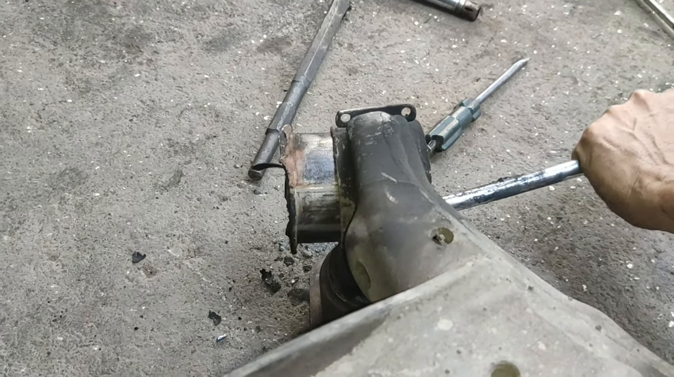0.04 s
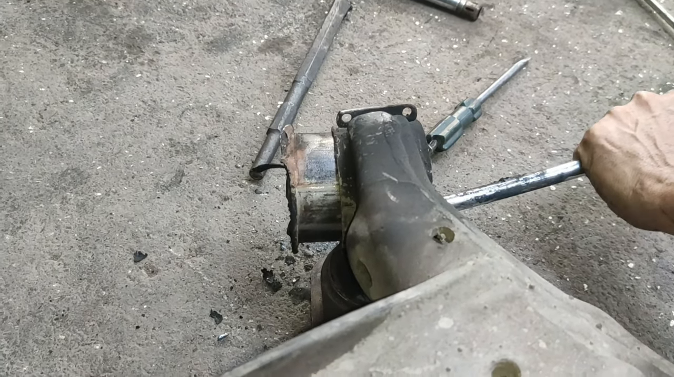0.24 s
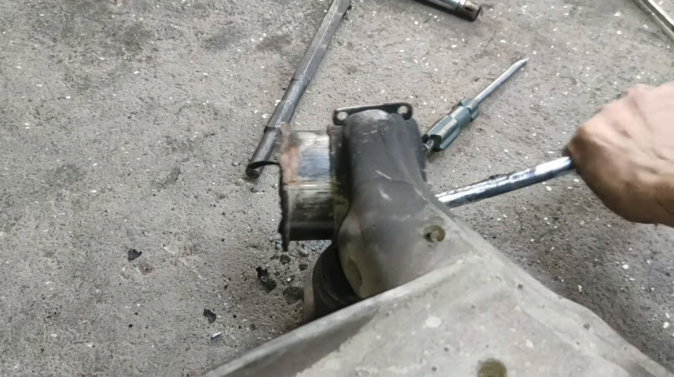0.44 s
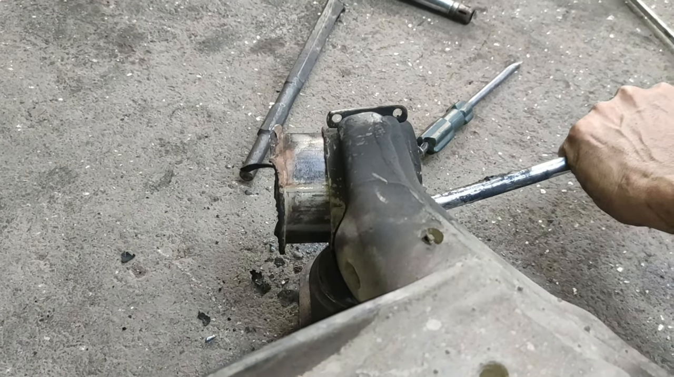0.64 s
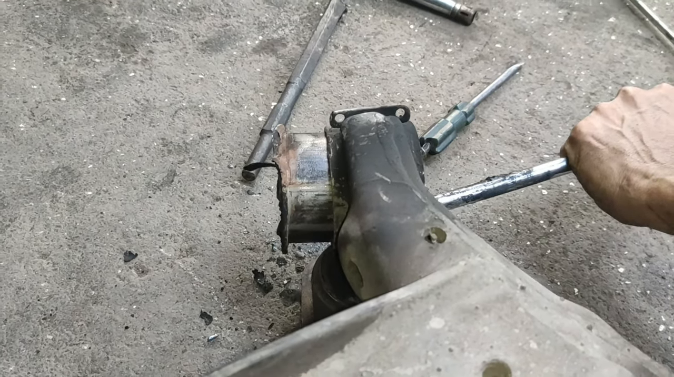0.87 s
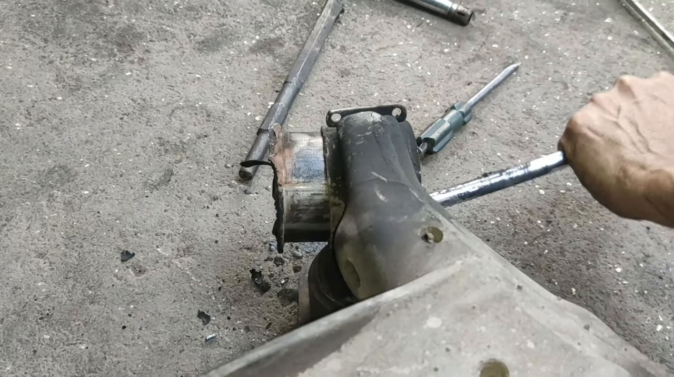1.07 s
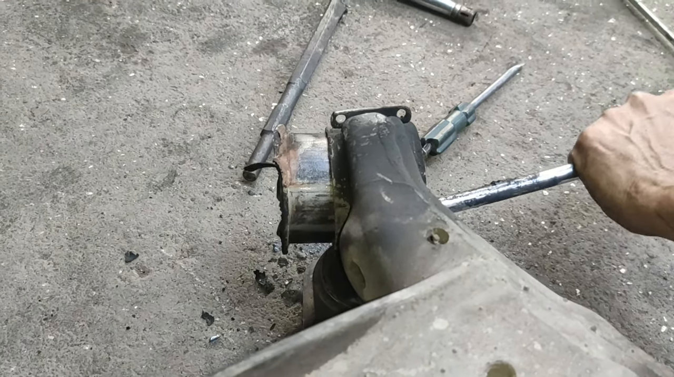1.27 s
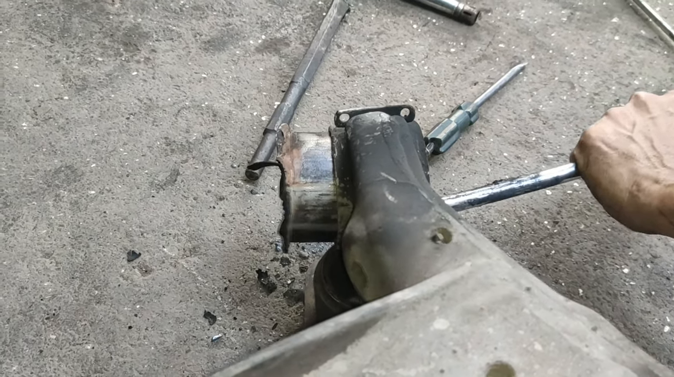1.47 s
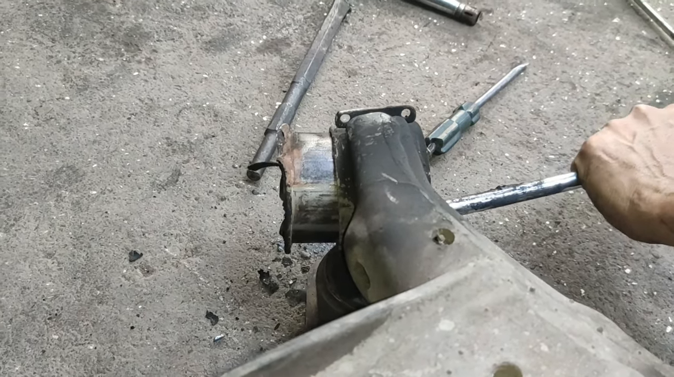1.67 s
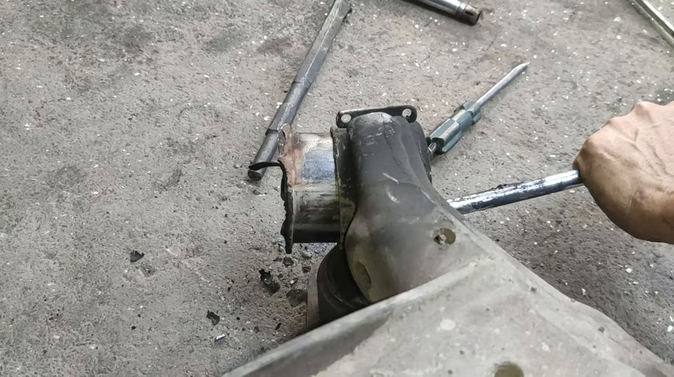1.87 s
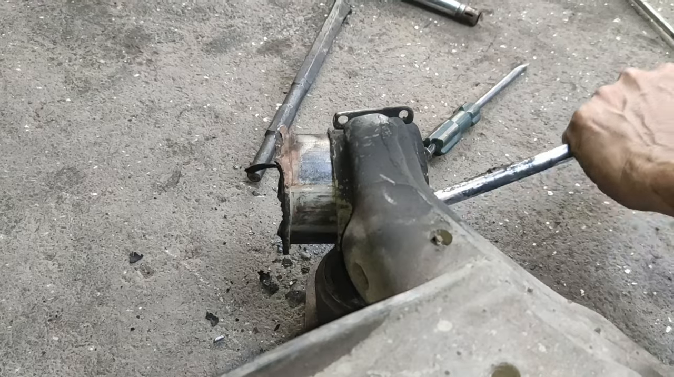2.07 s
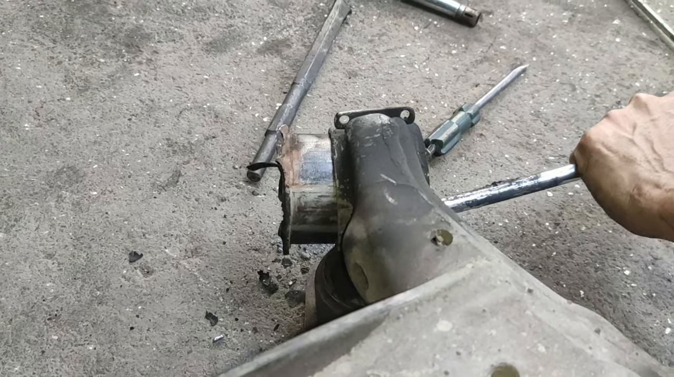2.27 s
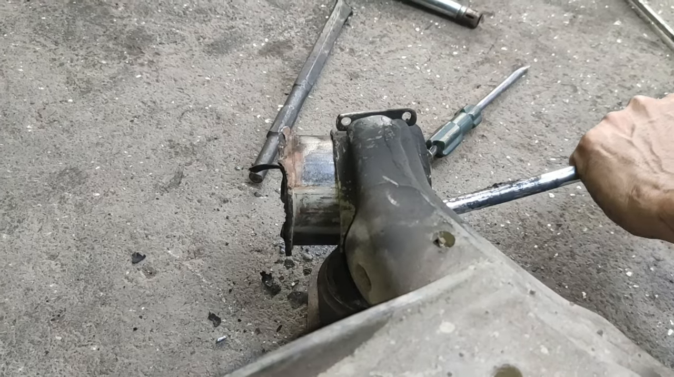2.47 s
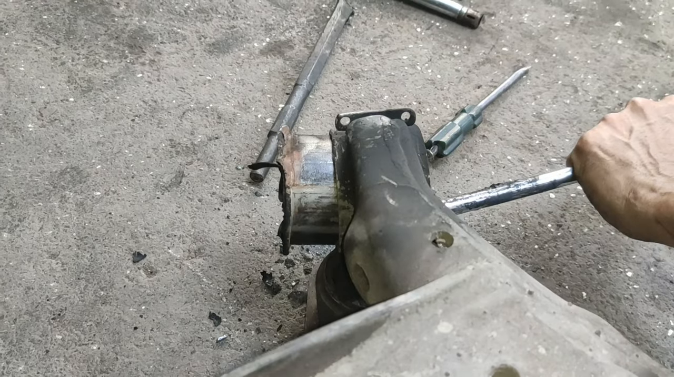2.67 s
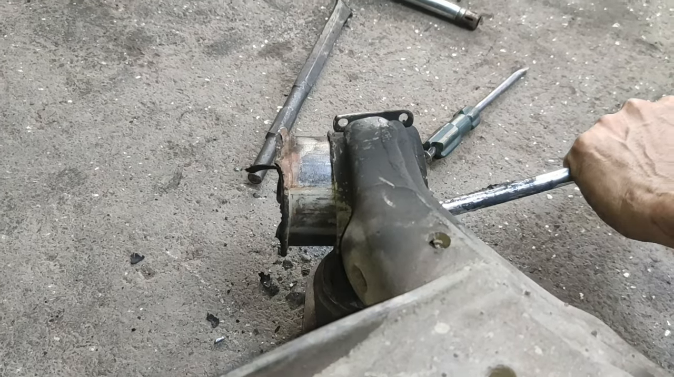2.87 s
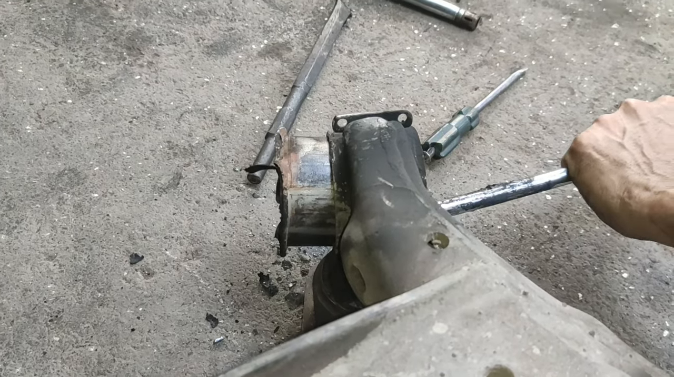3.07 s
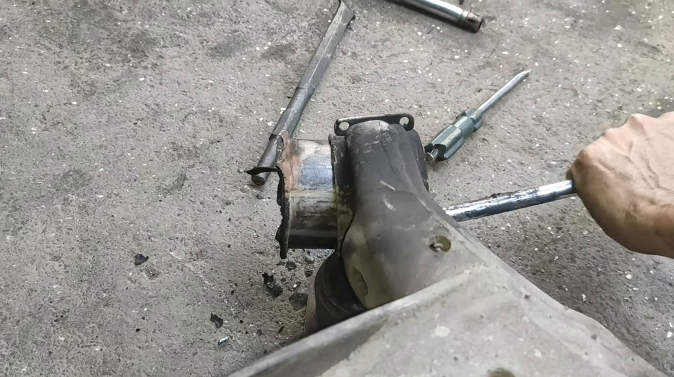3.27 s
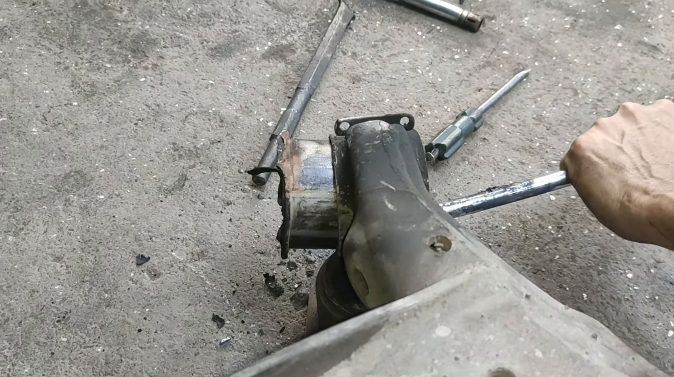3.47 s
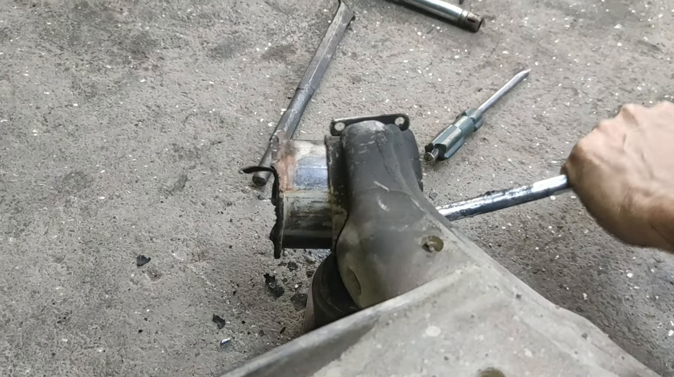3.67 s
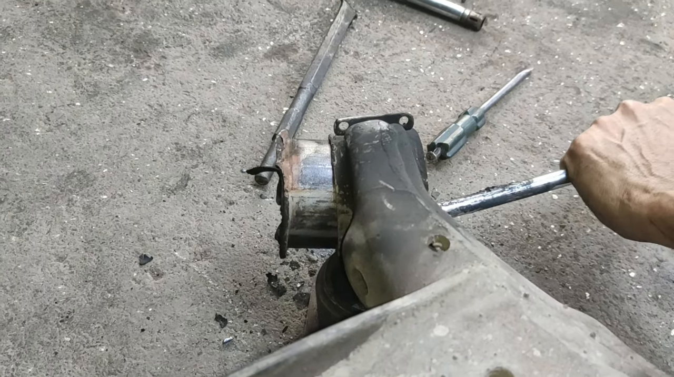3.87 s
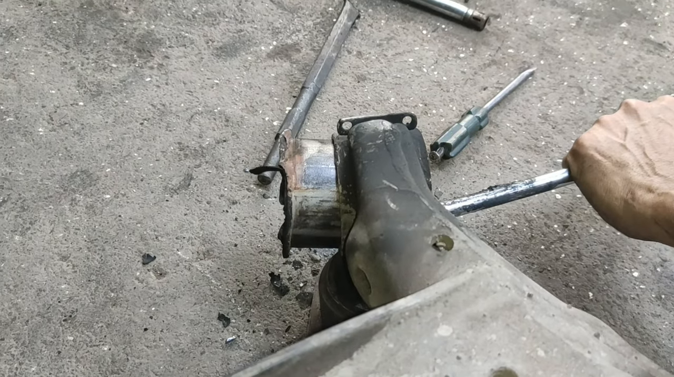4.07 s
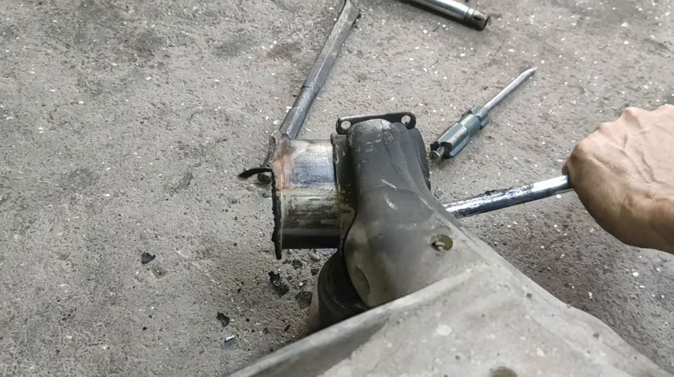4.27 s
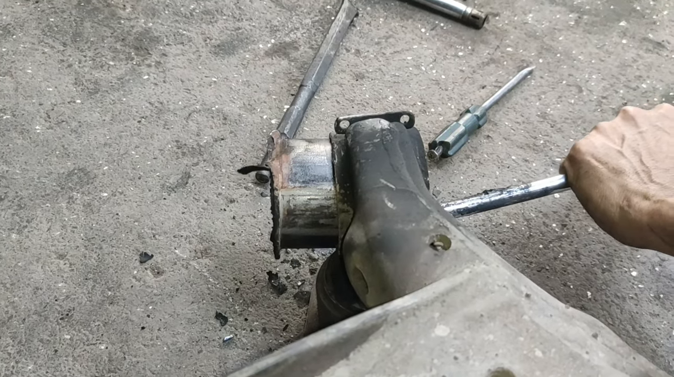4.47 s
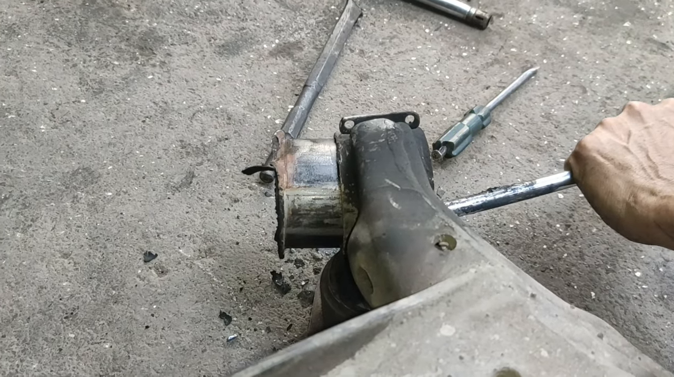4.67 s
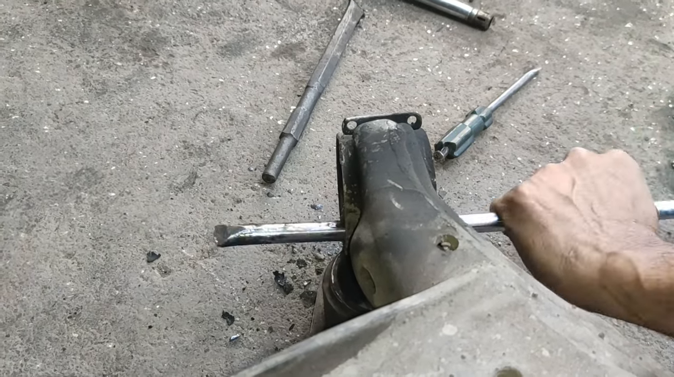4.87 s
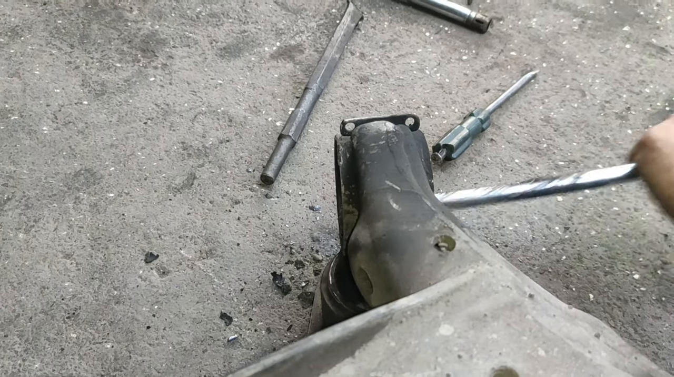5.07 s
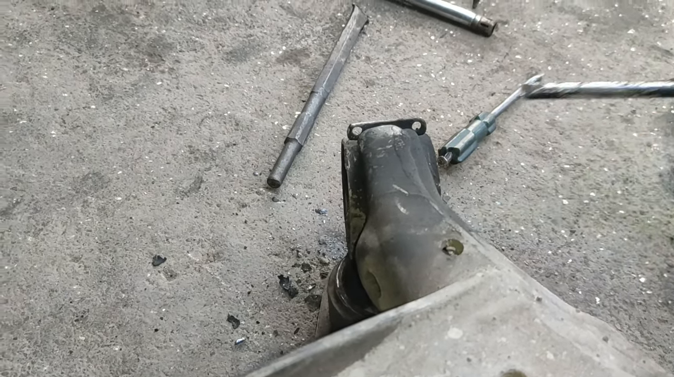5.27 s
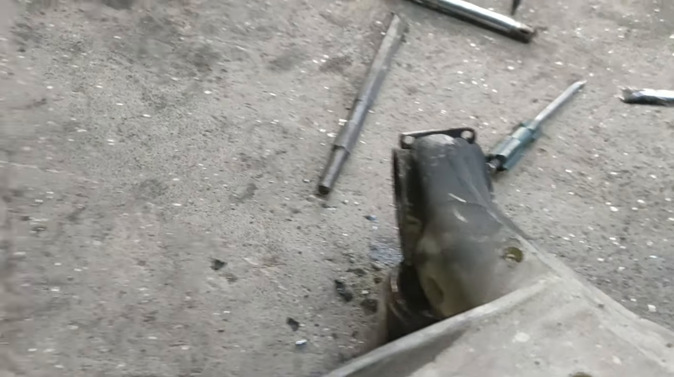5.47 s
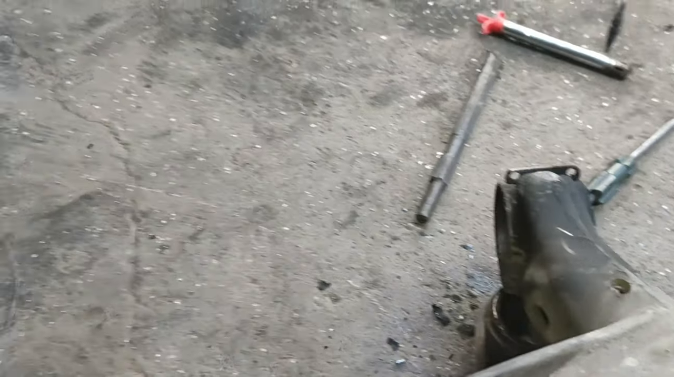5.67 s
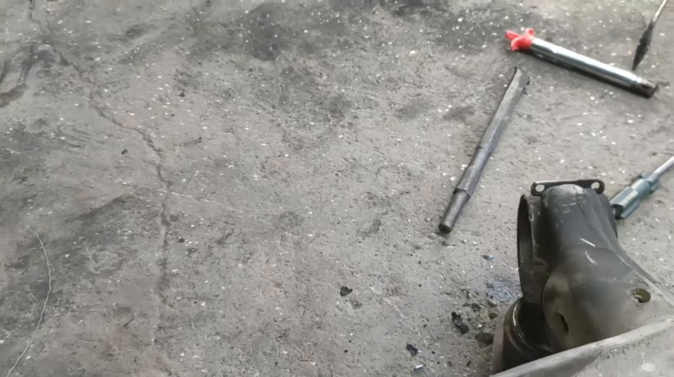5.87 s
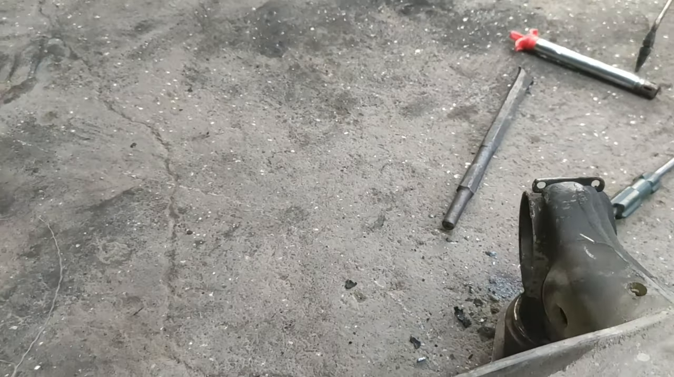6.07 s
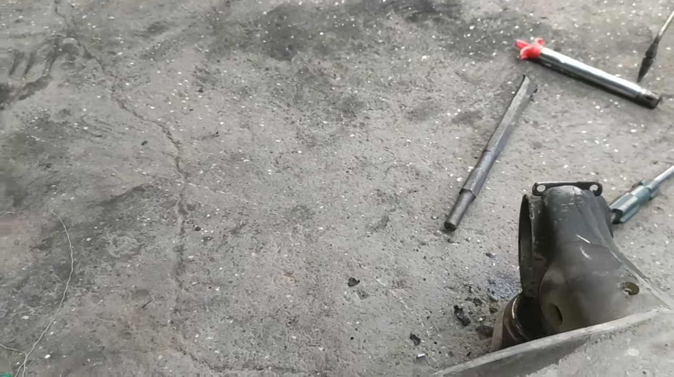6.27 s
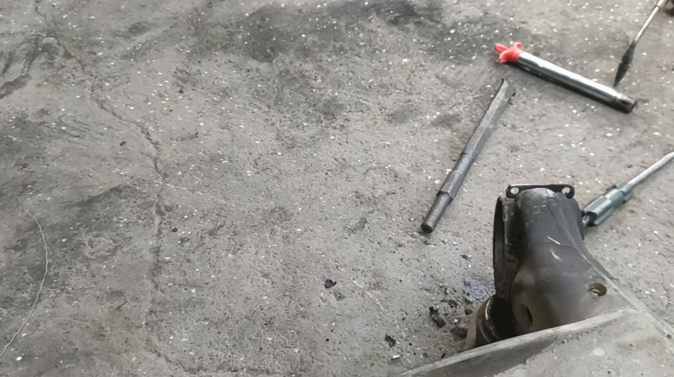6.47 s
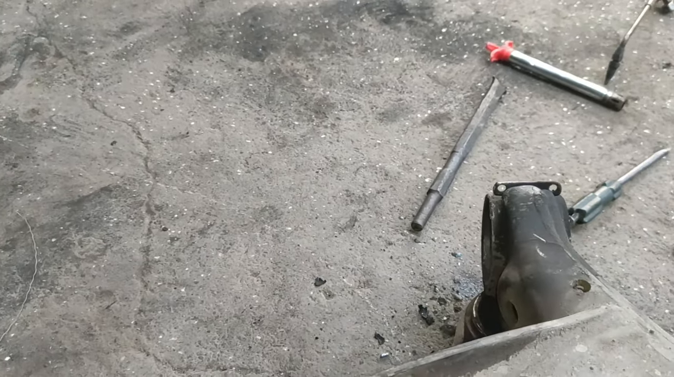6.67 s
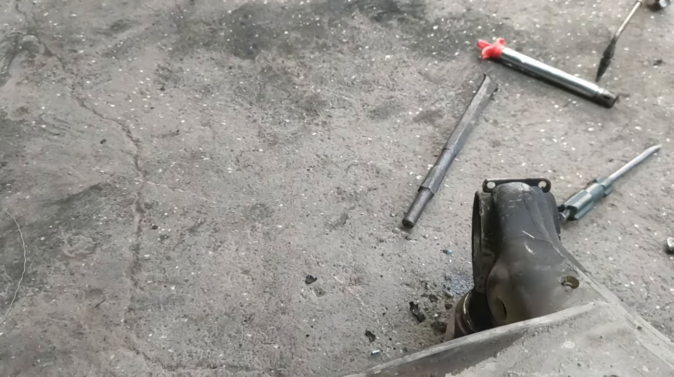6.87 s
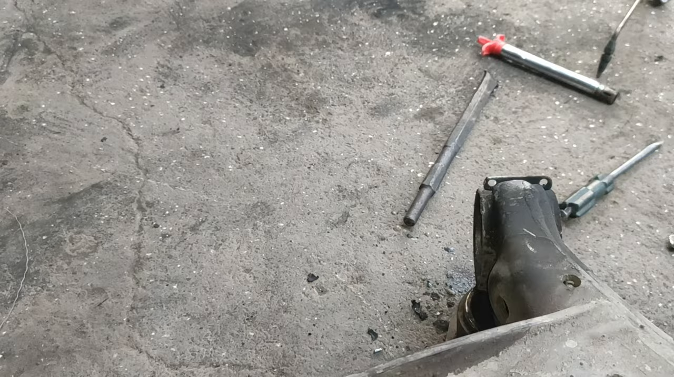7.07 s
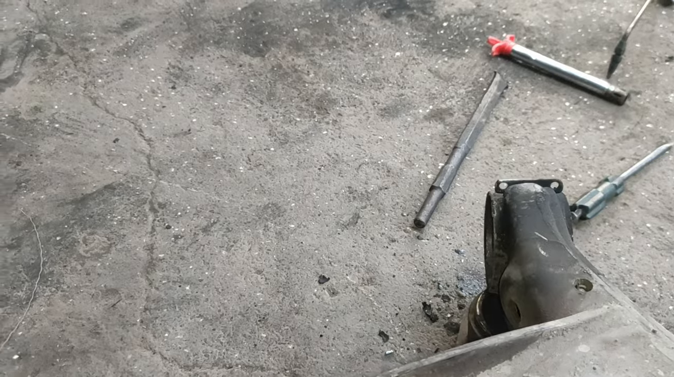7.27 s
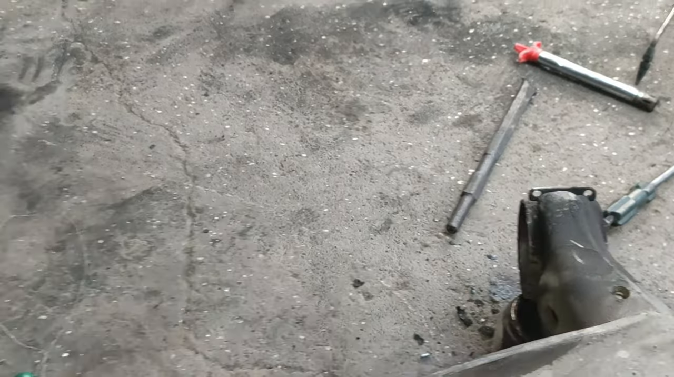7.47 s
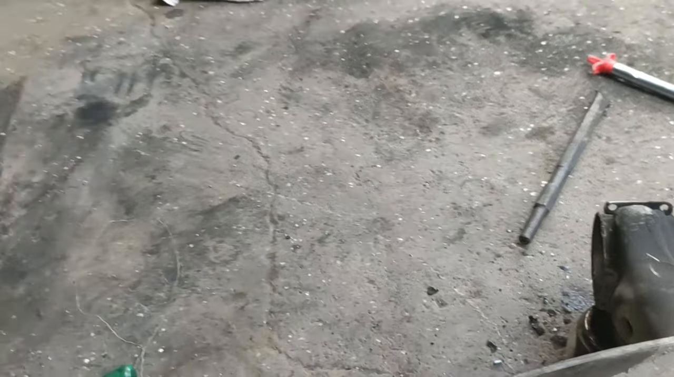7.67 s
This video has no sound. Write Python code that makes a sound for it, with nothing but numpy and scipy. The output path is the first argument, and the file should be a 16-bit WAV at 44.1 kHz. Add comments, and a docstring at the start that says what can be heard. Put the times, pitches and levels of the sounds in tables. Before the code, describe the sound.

In a reverberant workshop, a nearby phone catches steady, harsh steel-on-steel clangs with crunchy chatter and long metallic ringing. Small ticks come as the bar is reseated midway. Near five seconds the last blow grows brighter and thinner, a loose metal sleeve skips ringing across concrete, and heavy tools thud and clink down. Only fading ring, low distant rumble and thin hiss remain.

```python
"""Hard, clanging hammer blows fill a hard-walled workshop, heard close up by a phone that overloads.
The hammer drives a steel bar against an old bush in a suspension arm: noise and decaying sines make each clang.
The last blow frees the bush, whose steel sleeve bounces ringing over the concrete on decaying sines;
then hammer and bar are put down with noise thuds and ringing clinks. Filtered noise gives the hall and rumble."""
import sys
import numpy as np
from scipy import signal
from scipy.fft import rfft, irfft
from scipy.io import wavfile

SR = 44100
rng = np.random.default_rng(int(sys.argv[2]) if len(sys.argv) > 2 else 0)


def int16_out(signal):
    """Quantize to a 16-bit WAV file."""
    q = np.round(np.clip(np.atleast_2d(signal).T, -1, 1) * 32767)
    wavfile.write(sys.argv[1], SR, q.astype(np.int16))


N = 340872  # length of the scene in samples
LENGTH = 55296  # longest single sound in samples
AGE = np.arange(LENGTH) / SR  # seconds since a sound began
FREQ = np.fft.rfftfreq(LENGTH, 1 / SR)  # Hz


def undb(db):
    """Decibels to gain."""
    return 10 ** (np.asarray(db) / 20)


def read(points, hz):
    """Interpolate a table of (Hz, value) on a log-frequency axis."""
    f, value = np.transpose(points)
    return np.interp(np.log(hz + 1), np.log(f), value)


def fade(t60):
    """Exponential decay, 60 dB down after t60 seconds."""
    return np.exp(-np.log(1000) * AGE / t60)


def bump(x, centre, octaves):
    """A bell of height 1 on a logarithmic axis."""
    return np.exp(-.5 * (np.log2((x + 1) / centre) / octaves) ** 2)


def add(out, s, sound):
    """Mix a stereo sound in at time s, cut at both ends of the scene."""
    start = int(s * SR)
    a, b = max(start, 0), min(start + sound.shape[1], N)
    out[:, a:b] += sound[:, a - start:b - start]


def noise(db, alike_hz, likeness=1.0, size=LENGTH):
    """Stereo noise of rms 1 with a dB spectrum; the two microphone ports hear most alike below alike_hz."""
    hz = np.fft.rfftfreq(size, 1 / SR)
    alike = min(likeness, 1) / (1 + (hz / alike_hz) ** 2)
    spectra = rfft(rng.standard_normal((2, size))) * undb(db)
    mid, side = spectra * np.sqrt([1 + alike, 1 - alike])
    x = irfft([mid + side, mid - side], size)
    return x / x.std()


def die_away(x, t60s):
    """Split x into overlapping bands and let each decay in its own time."""
    spectrum, out = rfft(x), 0
    centres = [hz for hz, _ in t60s]
    for (_, t60), share in zip(t60s, np.eye(len(t60s))):
        band = irfft(spectrum * read(list(zip(centres, share)), FREQ))
        out = out + band * fade(t60)
    return out


def patches(width_hz):
    """Random clusters and gaps in a dense set of modes; spread near 1."""
    knots = np.arange(0, SR / 2, width_hz)
    return np.interp(FREQ, knots, rng.standard_normal(len(knots)))


def waver(rate_hz, count):
    """Rows of random drift, with a new target rate_hz times a second; spread near 1."""
    knots = np.arange(0, AGE[-1] + 1, 1 / rate_hz)
    return np.array([np.interp(AGE, knots, row) for row in rng.standard_normal((count, len(knots)))])


def ringing(modes):
    """One decaying complex sine for each mode."""
    return np.array([undb(db) * fade(t60) * np.exp(2j * np.pi * hz * AGE) for hz, db, t60 in modes])


def strike(rings, hz, lift_db, scatter_db):
    """Modes excited by one contact; the higher ones reach the two ports with more unlike phase."""
    phase, apart, left, right = rng.standard_normal((4, len(hz)))
    spread = np.minimum(hz / 700, 2)  # radians between the ports, before scatter
    turn = 2 * np.pi * phase + np.outer([-.5, .5], spread * (1 + .5 * apart))
    gain = undb(lift_db + scatter_db * np.array([left, right]))
    return ((gain * np.exp(1j * turn)) @ rings).imag


# Background of the workshop at the microphone. Each row: frequency in Hz, relative level in dB per Hz.
AIR_SPECTRUM = [(12, -35), (20, 0), (107, -4), (137, -13.5), (221, -13), (247, -21), (276, -15), (309, -20),
                (420, -26), (639, -23.5), (1520, -31), (5200, -34), (9880, -38.5), (15900, -50.5)]


def workshop():
    """Distant rumble and a thin hiss: steady filtered noise whose level drifts slightly."""
    db = read(AIR_SPECTRUM, np.fft.rfftfreq(N, 1 / SR))
    swell = np.interp(np.arange(N) / SR, np.arange(40) / 5, rng.standard_normal(40))
    air = noise(db, alike_hz=900, likeness=.68, size=N)
    left_right_db = np.array([[-33.2], [-34.5]])
    return undb(left_right_db + .5 * swell) * air


# Echoes between the far walls. Each row: frequency in Hz, decay by 60 dB in seconds.
HALL_DECAY = [(100, 1.9), (300, 1.21), (900, 0.95), (2000, 1.044), (4500, 0.96), (8500, 0.7), (14000, 0.34)]


def hall(x, build_s):
    """Diffuse echoes build up between the far walls and die away, the high treble soonest."""
    colour_db = read([(100, -1.5), (400, 1.5), (1000, 3.0), (3000, -2), (8000, 0), (15000, 6)], FREQ)
    echoes = die_away(noise(colour_db, alike_hz=650), HALL_DECAY) * (1 - fade(build_s))
    boom_db = read([(80, -28), (135, -3), (170, -3.0), (205, -7.0), (260, -7.0), (450, -15), (2000, -98)], FREQ)
    boom = noise(boom_db, alike_hz=800)
    # the low boom arrives late, strongest after 85 ms
    echoes += undb(-19.0) * boom * bump(AGE * SR, .085 * SR, octaves=0.24)
    echoes /= np.sqrt(np.sum(echoes ** 2) / 2)  # unit energy
    return signal.fftconvolve(x, echoes, axes=1)[:, :N]


# Steel touching something hard, close by. Each row: frequency in Hz, relative level in dB.
CLICK_SPECTRUM = [(300, -3), (1500, -6.5), (4000, -0.5), (8000, 3.5), (15000, -10)]


def click(db, t60):
    """The short bright crack of steel touching something hard: decaying noise."""
    return undb(db) * noise(read(CLICK_SPECTRUM, FREQ), alike_hz=1500) * fade(t60)


# Bush, hammer and bar landing dully on the concrete. Each row: start in seconds, level in dB, pitch in Hz.
LANDINGS = [(4.961, -14.5, 278), (5.103, -16.5, 647), (5.336, -29, 721), (5.767, -16, 660),
            (5.8437, -13.5, 267), (5.974, -25, 227), (6.015, -16, 252), (6.174, -18, 1270)]
# The thud of concrete. Each row: frequency in Hz, relative level in dB.
THUD_SPECTRUM = [(60, -15), (220, 0), (600, 2), (1300, -5.5), (3000, -11.5), (7000, -26), (16000, -69)]
# Small metal ticks as the bar is seated again. Each row: start in seconds, level in dB.
SEATING_TICKS = [(2.9581, -15.5), (2.98, -20), (3.166, -25)]
REBOUND_S, REBOUND_SHRINK, REBOUND_DB = .024, .8, -12  # first hop in s, ratio of the next, dB per hop
LANDING_S = 0.0018  # each knock swells in softly over this many seconds


def knocks():
    """Heavy things landing on concrete thud, hop and rattle on the grit; the bar ticks in its seat."""
    out = np.zeros((2, N))
    for s, db, hz in LANDINGS:
        thud_db = read(THUD_SPECTRUM, FREQ) + 7.5 * bump(FREQ, hz, octaves=0.3)  # the pitch stands out
        for hop in range(3):  # each hop comes sooner and weaker
            thud = noise(thud_db, alike_hz=1390)
            rattle = undb(-13.5 + 3.8 * waver(rate_hz=147, count=1)) * fade(0.6) * thud
            knock = die_away(thud, [(250, 0.1), (900, 0.038), (4000, 0.018)]) + rattle
            add(out, s, undb(db + hop * REBOUND_DB) * knock * (1 - fade(LANDING_S)))
            s = s + REBOUND_S * REBOUND_SHRINK ** hop
    for s, db in SEATING_TICKS:
        add(out, s, click(db, t60=0.097))
    return out


def dropped(modes, contacts, lift_db, octaves, click_db, click_growth, click_t60,
            pan_db, tumble_hz, tumble_db):
    """A steel part meeting the floor: each contact favours a group of modes and clicks louder the harder it is."""
    out, rings, hz = np.zeros((2, N)), ringing(modes), np.array(modes)[:, 0]
    hardest_db = max(ring_db for _, ring_db, _ in contacts)
    for s, ring_db, best_hz in contacts:
        # as the part turns, the lobes of each mode sweep past the microphone
        turning = rings * undb(tumble_db * waver(tumble_hz, count=len(hz)))
        excited_db = ring_db + lift_db * bump(hz, best_hz, octaves)
        ring = strike(turning, hz, excited_db, scatter_db=5.5)
        crack = click(click_db + click_growth * (ring_db - hardest_db), click_t60)
        add(out, s, ring * undb([[pan_db / 2], [-pan_db / 2]]) + crack)
    return out


# Bending modes of the bar. Each row: frequency in Hz, relative level in dB, decay by 60 dB in seconds.
BAR_MODES = [(2789, -7, 0.33), (4590, -1.5, 0.25), (6784, 5, 0.34), (9200, 4, 0.2), (11940, -9.5, 0.26),
             (15210, -18, .24)]
# The bar meets the floor. Each row: start in seconds, ring level in dB, best excited frequency in Hz.
BAR_CLINKS = [(5.7517, -32.5, 4260), (5.885, -36, 12900), (5.901, -34.5, 10600), (6.175, -23, 4550),
              (6.2, -19, 3550), (6.311, -44.5, 5560)]


def bar_put_down():
    """The bar clinks on the floor and its bending modes ring briefly."""
    return dropped(BAR_MODES, BAR_CLINKS, lift_db=11.5, octaves=0.44, click_db=-19.5, click_growth=0.47,
                   click_t60=0.025, pan_db=0.5, tumble_hz=30.6, tumble_db=0.5)


# Ring modes of the bush's sleeve, some in close pairs.
# Each row: frequency in Hz, relative level in dB, decay by 60 dB in seconds while it is free.
SLEEVE_MODES = [(1254, -10, 1.2), (1322, -3, 1.3), (1863, -6, 1.5), (3305, -2, .7), (3596, -9, .6),
                (3768, -5, .42), (4138, -6, .55), (5001, -2, .52), (6250, -12, .3), (6432, 0, .33),
                (6681, 0, .42), (7257, -14, .25), (7754, -7, .22), (8140, -2, .2), (8366, -6, .22),
                (9162, -15, .25), (10350, -15, .3), (10815, -12, .25), (12400, -14, .22), (12785, -12, .25),
                (13464, -13, .3), (14660, -16, .25), (15400, -16, .2)]
# The sleeve is struck free, bounces and rocks.
# Each row: start in seconds, ring level in dB, best excited frequency in Hz.
SLEEVE_BOUNCES = [(4.772, -26.5, 6700), (4.9605, -26, 3940), (5.103, -31, 4670), (5.1955, -32.5, 5960),
                  (5.2615, -24, 5000), (5.265, -25, 7800), (5.335, -43, 1330), (5.42, -36.5, 1770)]
REST_S, REST_T60 = 5.47, 0.64  # in s: the sleeve comes to lie on its side, which adds this decay


def sleeve_bouncing():
    """The freed sleeve rings in its ring modes at each bounce, until lying on its side damps it."""
    sleeve = dropped(SLEEVE_MODES, SLEEVE_BOUNCES, lift_db=10.5, octaves=0.15, click_db=-9, click_growth=1.9,
                     click_t60=0.062, pan_db=4.5, tumble_hz=27.2, tumble_db=8.0)
    lying_s = np.maximum(np.arange(N) / SR - REST_S, 0)
    return sleeve * np.exp(-np.log(1000) * lying_s / REST_T60)


# Hammer blows close to the microphone; the first is already under way. Each row: start in seconds,
# force in dB, resonance in Hz that this seating of the bar favours, its lift in dB.
HAMMER_BLOWS = [(-.035, 4, 5070, -0.5), (0.484, 2, 3360, 2.5), (0.9951, 2.5, 6370, 4.5),
                (1.529, 2.5, 4500, 5), (2.0572, 0.5, 3280, 2), (2.6, 2, 4600, 3), (3.1745, 2, 5240, 2),
                (3.7076, 2, 6430, 6), (4.2495, 3, 6450, 5), (4.7723, 0.5, 7050, 1)]
FREE_S = HAMMER_BLOWS[-1][0]  # the last blow frees the bush


def slipping(s, tight_db, change_db, onset_s):
    """Level of one part of a blow at time s: the bush loses its grip ever faster until it comes free."""
    return tight_db + change_db * np.exp((s - FREE_S) / onset_s)


# The clang's dense modes. Each row: frequency in Hz, relative level in dB.
CLANG_SPECTRUM = [(40, -0.5), (110, -4), (190, -2), (310, -7.5), (550, 1.5), (1150, -1.5), (1520, -5),
                  (2200, 0), (2800, -1.5), (4000, 0.5), (6400, -1.5), (7300, -3), (10000, -5.5),
                  (15500, -13.5)]
# How the clang dies away. Each row: frequency in Hz, decay by 60 dB in seconds.
CLANG_DECAY = [(100, 0.73), (700, 0.84), (2500, 0.81), (7000, 0.72), (15000, 0.42)]
# Strong modes of the arm. Each row: frequency in Hz, relative level in dB, decay by 60 dB in seconds.
ARM_MODES = [(175.4, -6.5, 0.54), (198, -26.5, 1.6), (400, -16, 1.3), (545, -17.5, 1.5), (623, -7, 0.94),
             (730, -31, 0.66), (913.4, -5, 1.42), (1023, 1, 0.89), (1107, -2.5, 1.06), (1169, 7.5, 0.61),
             (1250, 6.5, 0.2), (1320, 4, 0.33), (1660, -8, 0.52), (2224, 6, 0.31), (2260, 8, 0.32),
             (2766, -3.5, 0.31), (3260, 7.5, 0.42), (6030, -21, 0.32), (6930, -3.5, 1.06)]
PORT_LAG = 15  # samples by which the left port hears the clang later; the right port is nearer


def hammering():
    """Each blow: a light first touch, a crack, the arm's dense clang and its few long modes."""
    clangs, tones = np.zeros((2, 2, N))
    rings, arm_hz = ringing(ARM_MODES), np.array(ARM_MODES)[:, 0]
    body_db = read(CLANG_SPECTRUM, FREQ) + 1.6 * patches(width_hz=42)
    for s, force_db, seat_hz, seat_db in HAMMER_BLOWS:
        bass_db = slipping(s, tight_db=1.6, change_db=-5.5, onset_s=0.8)
        treble_db = slipping(s, tight_db=0.84, change_db=6, onset_s=0.3)
        tilt = [(600, bass_db), (2500, 0), (9000, treble_db)]
        # every seating of the bar wakes other clusters of modes, with wider ones added in the treble
        wide_db = read([(1500, 0), (3000, 1.6)], FREQ) * patches(width_hz=170)
        clusters_db = 2 * patches(width_hz=60) + wide_db
        seating_db = seat_db * bump(FREQ, seat_hz, octaves=0.062)
        colour_db = body_db + read(tilt, FREQ) + seating_db + clusters_db
        clang = undb(-5.0) * die_away(noise(colour_db, alike_hz=2000), CLANG_DECAY)

        # hammer, bar and bush chatter against each other for a few hundredths of a second
        chatter_db = colour_db + read([(200, -8.0), (1000, -5.5), (3000, -2.0), (12000, -2)], FREQ)
        chatter = undb(-1) * noise(chatter_db, alike_hz=1330) / (1 + (AGE / 0.032) ** 4)
        blow = undb(force_db) * (clang + chatter)
        blow[0] = np.roll(blow[0], PORT_LAG)
        add(clangs, s, blow)
        add(clangs, s - .0025, click(db=-27, t60=0.052))  # first touch

        # the arm rocks after the blow, so its modes fade unevenly
        rocking = rings * undb(2 * waver(rate_hz=10.8, count=len(arm_hz)))
        tone = strike(rocking, arm_hz, read(tilt, arm_hz), scatter_db=3.5)
        # a loose bush passes less of the blow into the arm
        grip_db = slipping(s, tight_db=-24.19, change_db=-10, onset_s=0.46)
        add(tones, s, undb(force_db + grip_db) * tone)
    return clangs, tones


def scene():
    """The big arm radiates into the whole hall; the small parts on the floor are heard mostly direct."""
    clangs, tones = hammering()
    small = sleeve_bouncing() + bar_put_down() + knocks()
    into_hall = undb(-5.5) * clangs + undb(-4) * tones + undb(-12.5) * small
    echoes = hall(into_hall, build_s=0.11)
    left_right = undb([[.5], [-.5]])
    return (clangs + tones + echoes) * left_right + small + workshop()


def record(dry):
    """The phone flattens the loudest peaks and cuts everything above 15.9 kHz."""
    clipped = dry / (1 + np.abs(dry / .95) ** 8) ** (1 / 8)
    top_cut = signal.ellip(10, .2, 70, 15900, fs=SR, output="sos")
    return signal.sosfilt(top_cut, clipped)


dry = scene()
out = record(dry)
int16_out(out)
```